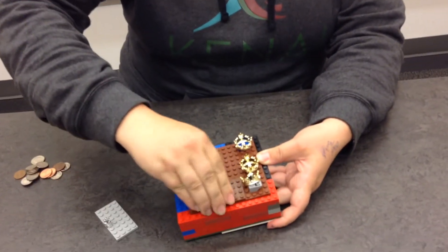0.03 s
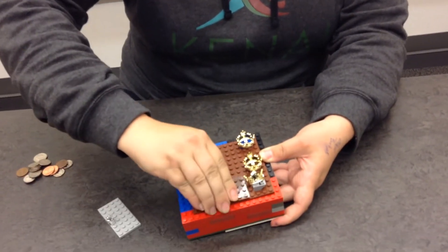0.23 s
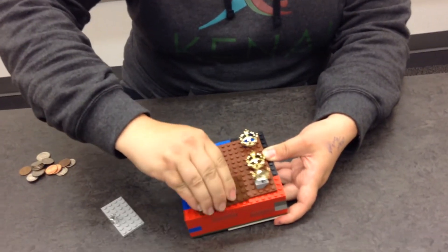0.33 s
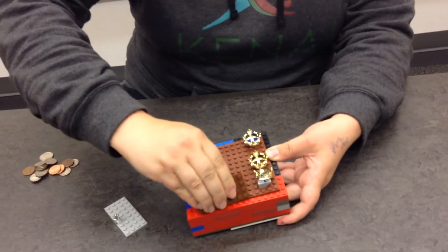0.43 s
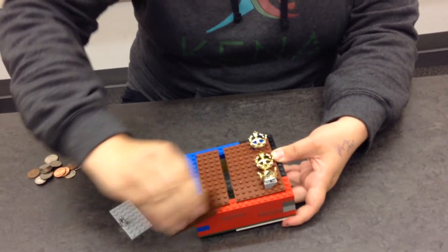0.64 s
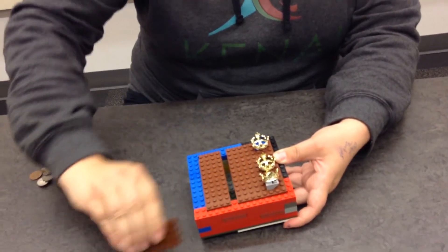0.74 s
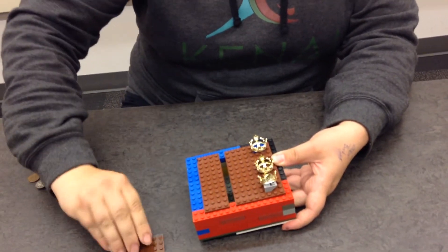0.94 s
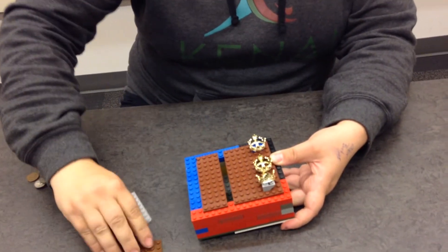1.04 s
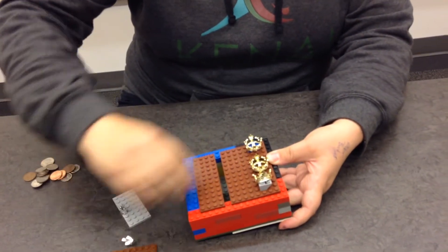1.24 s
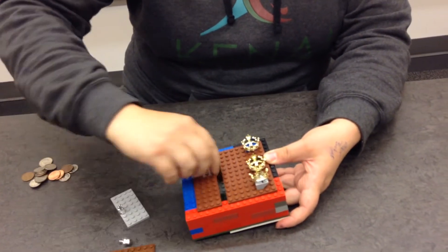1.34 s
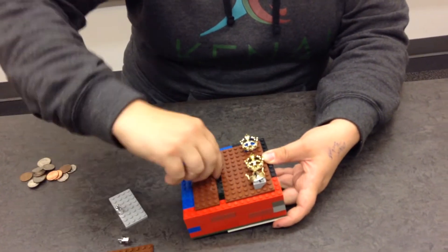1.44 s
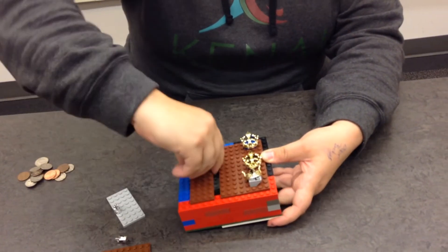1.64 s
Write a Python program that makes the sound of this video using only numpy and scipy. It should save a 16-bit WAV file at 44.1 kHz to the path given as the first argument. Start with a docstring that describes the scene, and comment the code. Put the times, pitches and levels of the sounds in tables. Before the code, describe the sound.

Plastic building bricks pried apart with sharp clicks, then a loose piece rattling onto a table

```python
"""A quiet, slightly live room with steady ventilation noise. Hands prise a plastic plate off a hollow box of
building bricks: studs creak, slip and snap free. The plate drops on the table, rattles and slides, a small
brick bounces to rest, and fingers grip the box again. Contacts are noise bursts and rubbing is dense tiny
slips, both ringing plastic resonances; single modes sing as fluttering sines. Filtered noise makes a whistle
and a soft noise: the end of an earlier sound dying away at the start, later a sleeve moving."""
import sys
import numpy as np
from scipy import signal
from scipy.fft import rfft, irfft, next_fast_len
from scipy.io import wavfile
from scipy.ndimage import map_coordinates

SR = 44100
rng = np.random.default_rng(int(sys.argv[2]) if len(sys.argv) > 2 else 0)


def wav_record(signal):
    """Record a signal, one row per channel, as 16-bit PCM in the file named by sys.argv[1]."""
    frames = np.transpose(np.atleast_2d(signal))
    bounded = np.clip(frames, -1, 1)
    # unit amplitude maps onto the largest positive 16-bit level
    quanta = np.round(bounded * 32767).astype(np.int16)
    wavfile.write(sys.argv[1], SR, quanta)


N = 74970

# Room noise spectrum. Each row: frequency in Hz, relative density in dB per Hz.
AIR_SPECTRUM = [(18, -78), (100, -20), (150, -6.5), (220, -6), (310, 1), (400, -8.5), (520, -5), (800, -13),
                (1500, -13.5), (2500, -26.5), (4500, -34.5), (7000, -36.5), (15700, -46.5)]
# Room decay. Each row: frequency in Hz, t60 in s.
ROOM_T60 = [(200, 0.93), (1000, 0.29), (2500, 0.31), (4500, 0.27), (6500, 0.14), (14000, 0.09)]
# Soft noise: the end of an earlier sound dying away, then a sleeve moving. Each row: time in s, level in dB.
SOFT_NOISE_LEVELS = [
    [(0, -73), (.06, -78), (.14, -98.5)],
    [(.6, -78), (.68, -75.5), (.8, -73.5), (.87, -75.5)],
]
# Soft noise spectrum. Each row: frequency in Hz, relative density in dB per Hz.
SOFT_NOISE_SPECTRUM = [(300, -26), (700, -3.5), (1500, -0.5), (2700, -6.5), (3600, -8.5), (6000, -17.5),
                       (9000, -29), (11500, -29), (14000, -18), (16000, -23)]
# The box pushed against the table. Each row: start in s, relative level in dB.
THUDS = [(.354, -45), (1.388, -55.5), (1.404, -63.5)]
# A thin rough whistle. Each row: time in s, level in dB.
WHISTLE_LEVELS = [(0.6, -96), (0.608, -89), (0.634, -82), (0.732, -78.5), (0.754, -71), (0.824, -78.5),
                  (0.87, -64)]
# Tiny ticks at the whistle's pitch. Each row: start in s, relative level in dB.
PINGS = [(0.6095, -41), (1.655, -52), (1.666, -45)]

# Edges in Hz of the four mode groups: hollow, wall, stud, edge.
GROUP_EDGES_HZ = (350, 1450, 2800, 6800, 16000)
# Stud slips and knocks on the box. Each row: start in s, relative level in dB, chatter t60 in s, treble lean
# of the stud modes in dB per octave, then relative strength of hollow, wall, stud and edge modes in dB.
BOX_CLICKS = [(.1415, -68, 0.012, 0, -22.5, -18, -8, -6), (.161, -52, 0.01, 20, -37, -18, -4.5, -8.5),
              (.166, -47, 0.0056, 3, -29, -22, -19.5, -27),
              (.2346, -21.5, 0.0088, 22, -35, -25.5, -17.5, -16.5),
              (.2754, -23.5, 0.0064, 22, -37, -24.5, -15.5, -9),
              (.3146, -35, 0.0096, 17, -30, -1, -4.5, -22), (.3378, -26, 0.012, 1, -38.5, -16, -8, -12.5),
              (.3474, -19.5, 0.02, -0.5, -35, -15, -9.5, -19),
              (.3544, -31.5, 0.017, -5, -4, -7.5, -34, -30), (.3742, -32.5, 0.0092, -12, -27, -7, -27, -32),
              (.4345, -47, 0.016, -17, -6.5, -4.5, -7.5, -37), (.537, -51, 0.012, -4, -9, -3, -2.5, -47),
              (.5443, -45.5, 0.018, -5, -12, -13, -7.5, -51), (.5545, -55, 0.006, -8, -15, -43, 2, -59),
              (.6105, -46, 0.013, 1.5, -34, -12, -9.5, -55), (.6177, -42, 0.015, -3, -13, -6, -9, -40)]
# Fingers closing on the box without its plate. Each row: as in BOX_CLICKS.
GRIP_CLICKS = [(1.3862, -44, 0.0173, 3, -2.5, -35, -32, -13),
               (1.4048, -35, 0.013, -5, -13, -6.5, -10.5, -27),
               (1.4135, -49.5, 0.039, -5, -9, -13, -39, -44),
               (1.4585, -52, 0.019, 0, -15, -0.5, -26.5, -40),
               (1.4648, -45.5, 0.013, -0.5, -29, -2, -35, -44),
               (1.4855, -50.5, 0.012, -2.5, -4.5, -7.5, -24, -50.5),
               (1.6665, -61, .012, 6, -18, -8, -21, -18)]
# The loose plate touching the table. Each row: as in BOX_CLICKS.
PLATE_CLICKS = [(0.8668, -36.5, 0.0046, -4.5, -19, -15, -13.5, -15.5),
                (0.8828, -43.5, 0.018, 3.5, -31, -9, 1.5, -7.5),
                (0.9447, -21.5, 0.04, 3.5, -45, -22.5, -28.5, -40.5),
                (0.9782, -32, 0.026, 13.5, -25.5, -16.5, -35.5, -31.5),
                (0.9895, -28.5, 0.015, 18, -23.5, -13.5, -7.5, -26)]
# A small brick bouncing to rest. Each row: as in BOX_CLICKS.
BRICK_CLICKS = [(1.0905, -33, 0.008, -15, -44, -11, -6, -28),
                (1.145, -31.5, 0.0061, -9, -58, -10, -7.5, -23),
                (1.2158, -50, 0.013, -6, -47, -18, -7.5, -36),
                (1.2385, -31.5, 0.0085, 7, -57.5, -15, -9, -17),
                (1.2633, -48, 0.0057, -6, -40.5, -43, -4, -29),
                (1.2692, -45, 0.014, 0, -49, -36, -7.5, -14.5),
                (1.2931, -41, 0.0085, 2, -58, -28, -8.5, -15),
                (1.3139, -53, 0.0057, -1, -41.5, -17, -7, -15)]
# Rubbing on the box, prise then grip. Each row: time in s, relative level of hollow, wall, stud and edge
# modes in dB.
BOX_RUB = [
    [(0.15, -82, -77, -87, -79), (0.168, -90, -67, -61, -75), (0.169, -82, -70, -73, -78),
     (0.185, -74, -62, -59, -56), (0.2, -65, -59, -51.5, -56), (0.225, -71.5, -62, -62, -63.5),
     (0.255, -76, -76, -83, -73), (0.266, -74, -91, -72, -74), (0.267, -75, -48, -48.5, -48),
     (0.284, -68, -70, -72, -59), (0.29, -68, -81, -71, -74), (0.291, -53, -49, -47, -49),
     (0.299, -60, -58, -59, -56), (0.303, -44, -48, -45.5, -46.5), (0.325, -45.5, -39, -48, -46.5),
     (0.365, -44, -52, -47.5, -54), (0.39, -66, -45.5, -46.5, -59.5), (0.41, -74.5, -60, -59, -62),
     (0.44, -66, -57, -57.5, -70), (0.47, -70, -63.5, -59.5, -85), (0.52, -61, -64, -67, -95),
     (0.56, -64.5, -65, -59.5, -89.5), (0.595, -68, -77, -82, -98), (0.635, -72, -74.5, -78, -95),
     (0.68, -76.5, -83, -95, -93)],
    [(1.345, -73.5, -62, -87, -81), (1.355, -67.5, -76.5, -65, -84), (1.356, -60, -59, -59.5, -66),
     (1.375, -61, -59.5, -57.5, -61), (1.395, -53, -54, -61, -61), (1.425, -71, -62, -75, -73),
     (1.45, -73.5, -74.5, -84, -84), (1.475, -57, -55, -83, -89), (1.5, -59, -73, -81.5, -93.6),
     (1.53, -62.5, -79, -83.5, -103), (1.57, -76.5, -90.5, -85.5, -101.5), (1.63, -77, -82, -98, -96)],
]
# The plate sliding. Each row: as in BOX_RUB.
PLATE_RUB = [(0.845, -84, -80.5, -88.5, -73.5), (0.858, -77.5, -72, -78.5, -68),
             (0.866, -57, -41, -48, -57), (0.867, -53.5, -49, -51, -51), (0.895, -46.5, -46, -41.5, -44),
             (0.92, -51, -45, -46.5, -55), (0.94, -55, -49.5, -43, -53.5), (0.96, -53.5, -44.5, -51, -56),
             (0.977, -56, -66, -47.5, -56), (0.978, -63, -54, -45, -53), (0.995, -42.5, -41, -37.5, -41.5),
             (1.02, -48.5, -40, -41, -45.5), (1.05, -48, -47.5, -45, -52.5),
             (1.08, -59.5, -50.5, -46, -57.5), (1.115, -64.5, -46.5, -50, -61.5),
             (1.16, -64.5, -53, -55.5, -80), (1.2, -64, -60.5, -67, -110),
             (1.25, -66.5, -73.5, -66.5, -94.5), (1.33, -76, -70.5, -79, -101)]
# Box resonances, plate on. Each row: frequency in Hz, width in Hz, relative level in dB.
BOX_MODES = [(460, 220, -12), (830, 59, 1.5), (1198, 130, -4.5), (1450.6, 200, -0.5), (1870, 130, 0.5),
             (2148, 240, 3), (2720, 100, -13.5), (3100, 2000, -11.5), (3790, 190, -2.5), (4084, 130, -1),
             (4860, 970, -9.5), (5530, 140, -3.5), (6410, 260, -21.5), (7440, 2600, -10.5),
             (9900, 1100, -9.5), (11800, 1600, -17.5)]
# Box resonances, plate off. Each row: as in BOX_MODES.
OPEN_BOX_MODES = [(496, 85, 4.5), (833, 200, -0.5), (1130, 1440, -7.5), (1911, 108, 1), (2270, 250, -9.5),
                  (2540, 240, -13), (3040, 220, -12), (3545, 130, 1), (4840, 340, 0.5), (6100, 660, -22),
                  (6810, 560, -3), (7870, 600, -7), (9560, 830, -7), (11880, 900, -11), (13670, 850, -7),
                  (14900, 480, -1)]
# Loose plate resonances. Each row: as in BOX_MODES.
PLATE_MODES = [(578, 66, -14.5), (1029, 256, -2.5), (1425, 113, 2.5), (1623, 230, -1), (1906, 37, 3.5),
               (2110, 290, -1), (2810, 78, -1.5), (3320, 1070, -0.5), (4310, 350, -0.5), (5050, 410, -1),
               (5720, 120, 2.5), (6410, 520, -1.5), (7150, 670, -8), (8650, 780, -11), (9390, 710, -8.5),
               (11600, 1400, -15.5), (13280, 740, -12.5), (14840, 1200, -13.5)]
# Small brick resonances. Each row: as in BOX_MODES.
BRICK_MODES = [(1190, 400, 0), (2170, 110, 0), (3514, 130, 6.5), (4800, 290, -7), (5800, 220, -5.5),
               (7160, 150, 5.5), (9120, 230, -7.5), (9600, 170, -11), (12000, 310, -20), (12400, 420, -26),
               (14900, 410, -38)]
# Single modes singing over the rubbing. Each row: start in s, pitch in Hz, level in dB, length in s.
SINGS = [(.267, 2010, -52.5, 0.012), (.372, 1846, -44.5, 0.017), (0.538, 1235, -63, 0.024),
         (.61, 2097, -54, 0.015), (0.86, 3322, -54, .04), (.888, 6500, -53.5, 0.034),
         (0.896, 5100, -55, 0.039), (0.934, 3365, -59, 0.11), (0.943, 2178, -50, 0.034),
         (0.99, 5600, -36, 0.0083), (1.008, 1830, -48, 0.024), (1.403, 1876, -50.5, 0.019),
         (1.486, 1860, -57, 0.014)]

AIR_DB, ROOM_DB = -71, -11.5
ROOM_DELAY_SAMPLES = 200
THUD_HZ, THUD_WIDTH_HZ, THUD_T60_S, THUD_GAIN_DB = 257, 350, 0.07, 20
WHISTLE_HZ, WHISTLE_WIDTH_HZ = 4880, 220  # width at half amplitude
PING_WIDTH_HZ, PING_T60_S, PING_GAIN_DB = 510, 0.0081, 18
RISE_S, BLOW_SHARE = 0.00058, 0.25  # rise time constant; share of a contact's energy in its blow
CLICK_GAINS_DB = (3.5, 6.63, 7.17, 7.5)  # per mode group
STUD_MID_HZ = 4600  # pivot of the treble lean
SLIPS_PER_S, SLIP_SPREAD_DB, RUB_GAIN_DB = 4500, 1.5, -4
DRIFT_DB, DRIFT_KNOTS_PER_S = 1.5, 40  # wander of the rubbing in each mode group
SING_RISE_S, SING_FLUTTER_DB, SING_FLUTTER_KNOTS_PER_S = 0.002, 2.5, 180
BASS_CUT_HZ, ROLL_HZ, TOP_HZ = 148, 14100, 15800


def amp(db):
    """dB to gain."""
    return 10 ** (np.asarray(db) / 20)


def unit(x):
    """Scale to rms 1."""
    return x / np.sqrt(np.mean(x ** 2, axis=-1, keepdims=True) + 1e-20)


def along(points, hz):
    """Interpolate (Hz, value) points on a log axis."""
    f, v = np.transpose(points)
    return np.interp(np.log(hz + 1), np.log(f + 1), v)


def curves(rows):
    """Gain per sample for each dB column, silent outside the rows."""
    s, *cols = np.transpose(sorted(rows))
    t = np.arange(N) / SR
    return amp([np.interp(t, s, c, left=-150, right=-150) for c in cols])


def wobble(knots_per_s):
    """Smooth random curve through normal knots."""
    return map_coordinates(rng.standard_normal(1000), [np.arange(N) * knots_per_s / SR])


def filtered(x, response):
    """Apply a complex response of frequency to x."""
    size = next_fast_len(N + SR // 2)
    return irfft(rfft(x, size) * response(np.fft.rfftfreq(size, 1 / SR)), size)[..., :N]


def noise(spectrum):
    """Noise of rms 1 with a given spectrum."""
    return unit(filtered(rng.standard_normal(N), lambda f: amp(along(spectrum, f))))


def butter(f, hz, kind, order):
    """Causal Butterworth response."""
    return signal.freqs(*signal.butter(order, hz, kind, analog=True), f)[1]


def resonator(f, hz, width_hz):
    """Response of one damped mode, 1 at its pitch."""
    return 1j * f * width_hz / (hz * hz - f * f + 1j * f * width_hz)


def resonances(modes, size, lean_db_per_octave=0):
    """Responses of the four mode groups, each band-limited and passing white noise at rms 1."""
    f = np.fft.rfftfreq(size, 1 / SR)
    out = np.zeros((4, len(f)), complex)
    for k, (hz, width_hz, db) in enumerate(modes):
        group = np.searchsorted(GROUP_EDGES_HZ, hz) - 1
        if group == 2:
            db = db + lean_db_per_octave * np.log2(hz / STUD_MID_HZ)
        out[group] += (-1) ** k * amp(db) * resonator(f, hz, width_hz)
    for group in range(4):
        out[group] *= butter(f, GROUP_EDGES_HZ[group:group + 2], "band", order=2)
    return out / np.sqrt(np.mean(abs(out) ** 2, axis=1, keepdims=True))


def chatter(t60_s):
    """A contact: one sharp blow inside a decaying noise burst, total energy set by the envelope."""
    t = np.arange(SR // 10) / SR
    shape = amp(-60 * t / t60_s) * (1 - np.exp(-t / RISE_S))
    burst = shape * rng.standard_normal(len(t))
    burst *= np.sqrt(1 - BLOW_SHARE) / np.linalg.norm(burst)
    burst += np.sqrt(BLOW_SHARE) * (shape == shape.max())
    return burst * np.linalg.norm(shape) / np.linalg.norm(burst)


def contacts(rows, gain_db, t60_s):
    """Bare contacts at the listed times, to drive a resonance."""
    drive = np.zeros(N + SR)
    for s, db in rows:
        drive[round(s * SR):][:SR // 10] += amp(db + gain_db) * chatter(t60_s)
    return drive[:N]


def clicks(rows, modes):
    """Each contact's chatter rings the mode groups, each with its own share of energy."""
    out, size = np.zeros(N + SR), 2 ** 13
    for s, db, t60_s, lean, *group_db in rows:
        burst = chatter(t60_s)
        rings = irfft(rfft(burst, size) * resonances(modes, size, lean), size)
        rings = unit(rings) * np.linalg.norm(burst) / np.sqrt(size)  # energy of the burst
        out[round(s * SR):][:size] += amp(db + np.add(group_db, CLICK_GAINS_DB)) @ rings
    return out[:N]


def rubbing(rows, modes):
    """Dense tiny slips of uneven size follow the level curves and ring the drifting mode groups."""
    hits = rng.random(N) < SLIPS_PER_S / SR
    sizes = rng.standard_normal(N) * amp(SLIP_SPREAD_DB * rng.exponential(size=N))
    drift = amp(RUB_GAIN_DB + DRIFT_DB * np.array([wobble(DRIFT_KNOTS_PER_S) for group in range(4)]))
    drive = drift * curves(rows) * unit(hits * sizes)
    size = 2 * next_fast_len(N)
    return irfft(rfft(drive, size) * resonances(modes, size), size).sum(axis=0)[:N]


def air():
    """Steady ventilation noise, shaped in spectrum."""
    return amp(AIR_DB) * noise(AIR_SPECTRUM)


def room(x):
    """Delayed noise tail in which each frequency dies at its own speed."""
    hz, t, z = signal.stft(rng.standard_normal(SR // 2), SR, nperseg=256)
    decay = amp(-60 * t / along(ROOM_T60, hz)[:, None])
    tail = signal.istft(z * decay, SR, nperseg=256)[1]
    delayed = np.pad(x, (ROOM_DELAY_SAMPLES, 0))
    return signal.fftconvolve(delayed, tail / np.linalg.norm(tail))[:N]


def soft_noise():
    """Soft noise: the end of an earlier sound dying away at the start, later a sleeve moving."""
    return sum(curves(rows)[0] for rows in SOFT_NOISE_LEVELS) * noise(SOFT_NOISE_SPECTRUM)


def whistle():
    """Narrow noise near one pitch."""
    def band(f):
        return 1 / (1 + ((f - WHISTLE_HZ) / WHISTLE_WIDTH_HZ * 2) ** 2)
    return curves(WHISTLE_LEVELS)[0] * unit(filtered(rng.standard_normal(N), band))


def thuds():
    """Soft low pushes ring the table top, one resonance applied twice."""
    drive = contacts(THUDS, THUD_GAIN_DB, THUD_T60_S)
    return filtered(drive, lambda f: resonator(f, THUD_HZ, THUD_WIDTH_HZ) ** 2)


def pings():
    """Short ticks ring one high resonance, applied twice."""
    drive = contacts(PINGS, PING_GAIN_DB, PING_T60_S)
    return filtered(drive, lambda f: resonator(f, WHISTLE_HZ, PING_WIDTH_HZ) ** 2)


def singing():
    """Single modes as fluttering sines that rise quickly, hold and fade."""
    t, out = np.arange(N) / SR, np.zeros(N)
    for s, hz, db, length_s in SINGS:
        u = np.clip(t - s, 0, None)
        shape = (1 - np.exp(-u / SING_RISE_S)) * np.exp(-(u / length_s) ** 4)
        flutter_db = SING_FLUTTER_DB * wobble(SING_FLUTTER_KNOTS_PER_S)
        out += amp(db + flutter_db) * shape * np.sin(2 * np.pi * hz * u)
    return out * np.sqrt(2)  # levels are rms


def brick():
    """Each bounce rings the small brick."""
    return clicks(BRICK_CLICKS, BRICK_MODES)


def plate():
    """Bounces and sliding ring the loose plate."""
    return clicks(PLATE_CLICKS, PLATE_MODES) + rubbing(PLATE_RUB, PLATE_MODES)


def box():
    """Clicks and rubbing ring the hollow box, first with its plate, then open."""
    prise_rub, grip_rub = BOX_RUB
    prise = clicks(BOX_CLICKS, BOX_MODES) + rubbing(prise_rub, BOX_MODES)
    grip = clicks(GRIP_CLICKS, OPEN_BOX_MODES) + rubbing(grip_rub, OPEN_BOX_MODES)
    return prise + grip


def scene():
    """Bricks with their room tail, plus whistle, soft noise and air."""
    bricks = box() + plate() + brick() + thuds() + pings() + singing()
    return (bricks + amp(ROOM_DB) * room(bricks) + whistle() + soft_noise() + air())[None]


def record(dry):
    """Cut the deep bass, roll off the top, stop at the band limit."""
    def response(f):
        bass_cut = butter(f, BASS_CUT_HZ, "high", order=4)
        roll_off = butter(f, ROLL_HZ, "low", order=16)
        return (f < TOP_HZ) * bass_cut * roll_off
    return filtered(dry, response)


dry = scene()
out = record(dry)
wav_record(out)
```